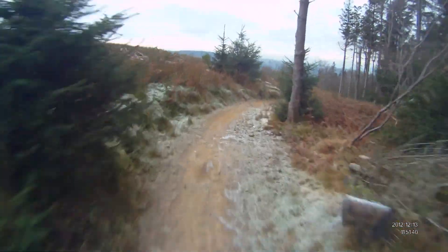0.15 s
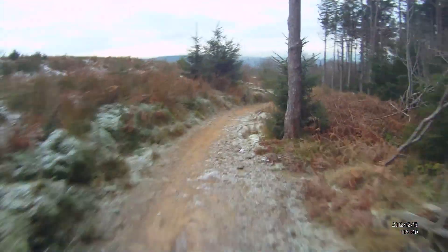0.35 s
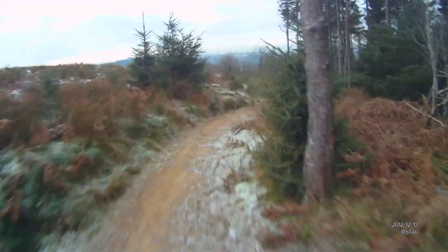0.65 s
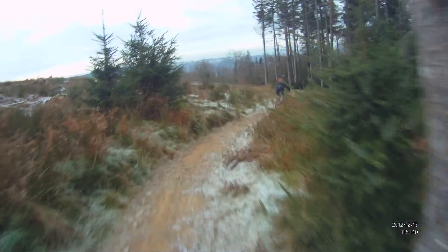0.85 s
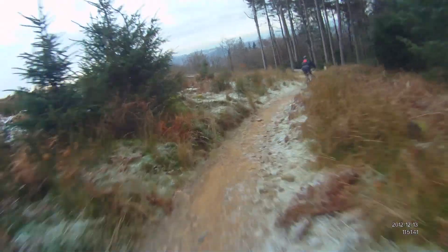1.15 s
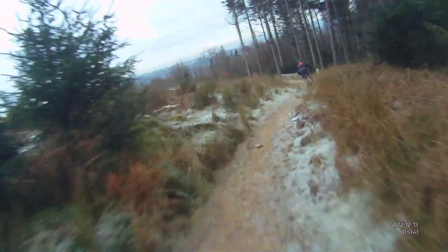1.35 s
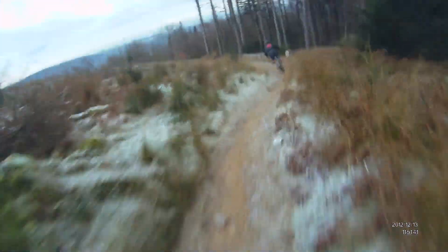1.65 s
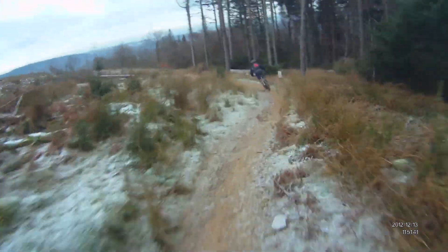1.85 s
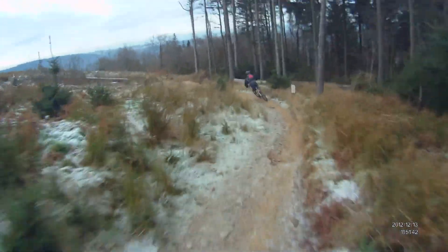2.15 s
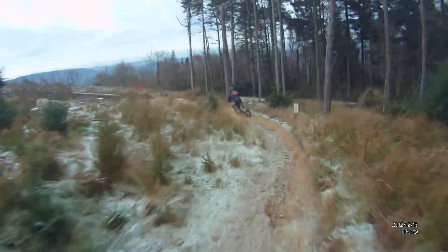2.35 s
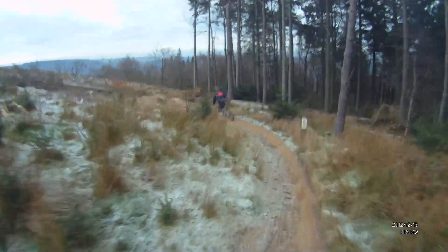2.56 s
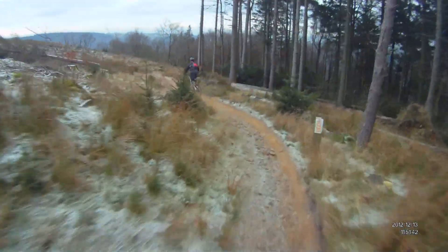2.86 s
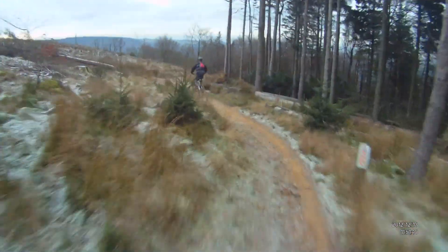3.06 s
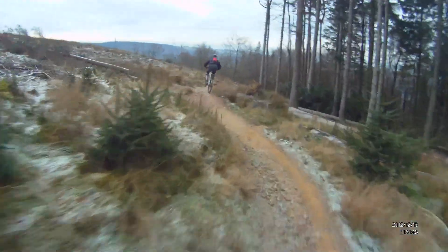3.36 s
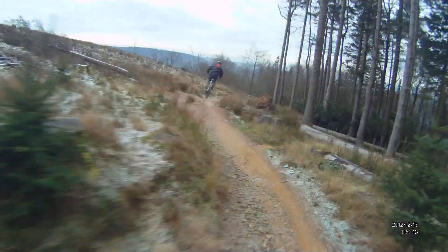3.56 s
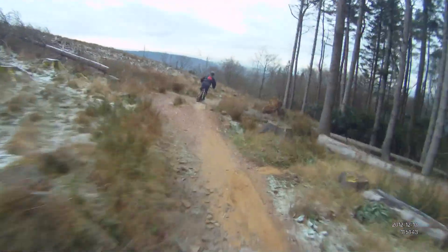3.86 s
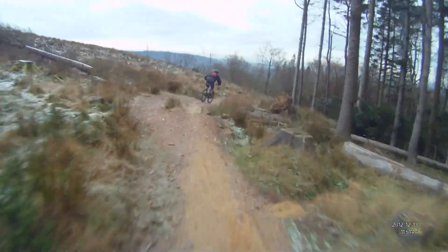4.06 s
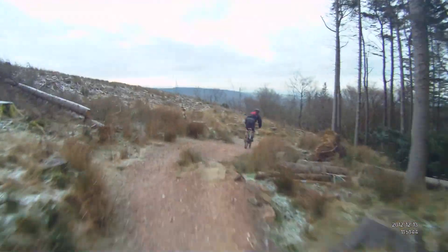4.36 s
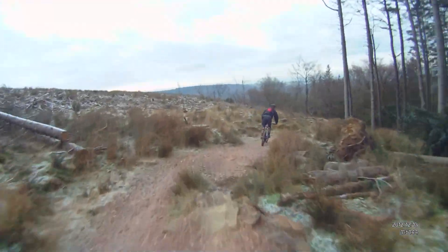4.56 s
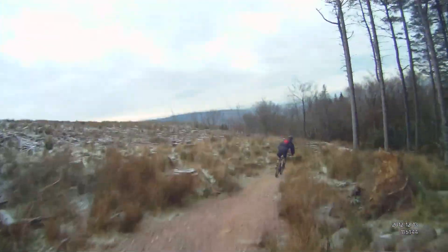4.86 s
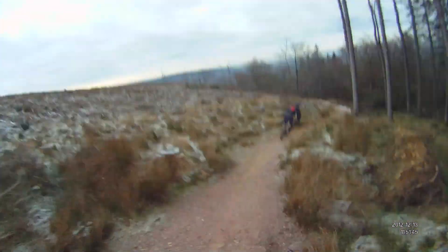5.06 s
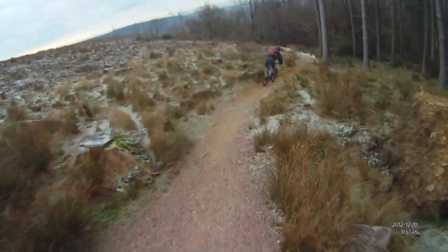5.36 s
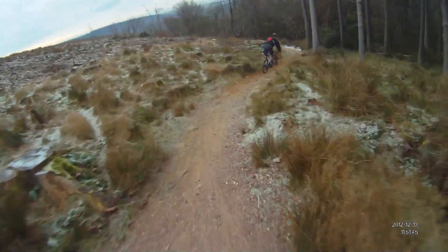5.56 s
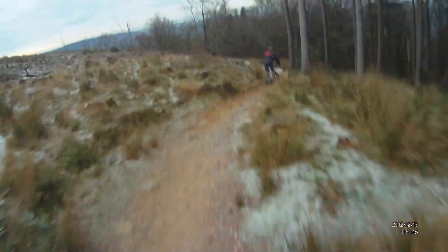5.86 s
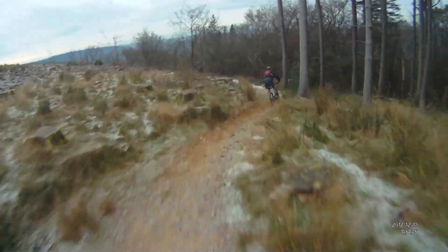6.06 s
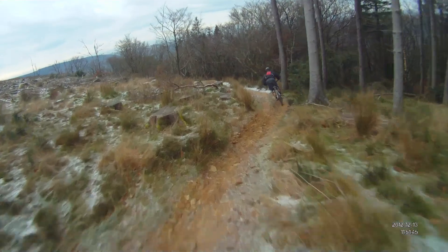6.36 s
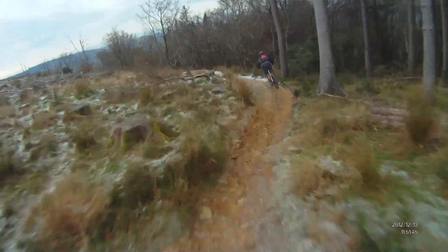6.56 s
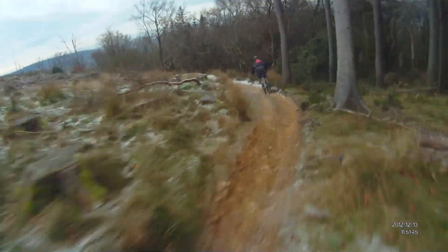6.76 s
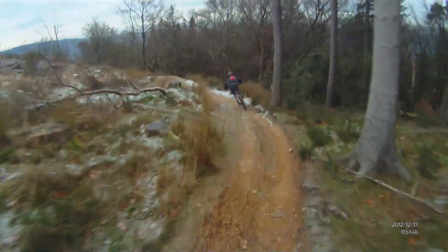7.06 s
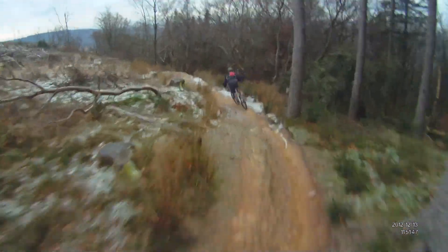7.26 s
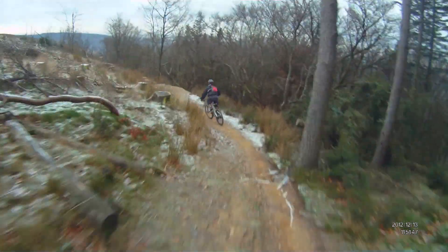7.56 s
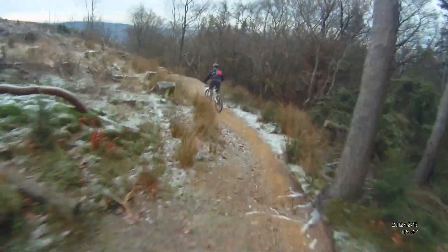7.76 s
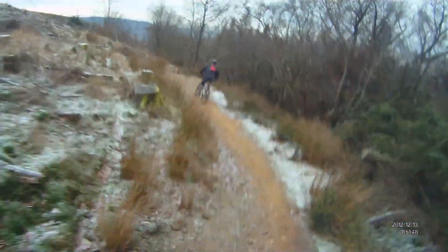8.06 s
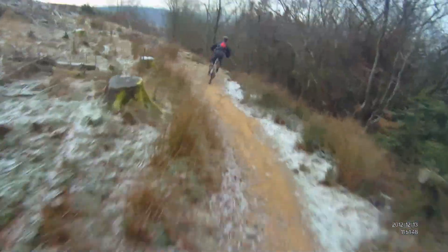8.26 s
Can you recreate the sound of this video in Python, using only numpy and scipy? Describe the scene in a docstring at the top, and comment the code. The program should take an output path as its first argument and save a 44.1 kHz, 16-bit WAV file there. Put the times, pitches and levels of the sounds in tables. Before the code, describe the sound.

Fast bike ride over loose stones heard from a small onboard camera: gritty crunch, clattering bumps, rattling ticks and buffeting wind that overloads.

```python
"""Gravel trail, fast downhill: a mountain bike, heard from a small camera in a plastic case that rides along.
Tyre crunch is random grains through the case resonances; scrubs are resonant noise, fine bursts bright grains.
Bumps ring the case modes in clacks that overload the microphone; the chain rattles as uneven runs of ticks.
Wind is shaped noise that swells with speed and crackles with spikes in strong gusts; single low thumps are
damped pops with band-passed noise. A faint hiss, rumble and thin whine lie underneath."""
import sys
import numpy as np
from scipy import signal
from scipy.fft import rfft, irfft
from scipy.io import wavfile

SR = 44100
rng = np.random.default_rng(int(sys.argv[2]) if len(sys.argv) > 2 else 0)


def wrap_up_sound(samples):
    """Save the sound to the file named by the first command line argument, as 16-bit audio."""
    columns = np.atleast_2d(samples).T
    # keep every value between -1 and 1, then stretch to whole-number steps
    tamed = np.clip(columns, -1, 1)
    steps = np.round(tamed * 32767).astype(np.int16)
    wavfile.write(sys.argv[1], SR, steps)


N = 370440
TIME = np.arange(N) / SR


def from_db(db):
    """Level in dB to amplitude."""
    return 10 ** (np.asarray(db) / 20)


def rms_one(x):
    """Scales to rms 1."""
    return x / np.sqrt(np.mean(x ** 2) + 1e-20)


def in_time(rows):
    """Straight lines between (time, value) rows."""
    return np.interp(TIME, *np.transpose(rows))


def swells(rows):
    """Sum of smooth bumps, one per (time s, half length s, height) row."""
    return sum(height * np.exp(-((TIME - at_s) / half_s) ** 2) for at_s, half_s, height in rows)


def butter(x, hz, kind, order=2):
    """Butterworth filter."""
    sos = signal.butter(order, np.clip(hz, 10, .45 * SR), kind, fs=SR, output="sos")
    return signal.sosfilt(sos, x)


def drift(rate_hz):
    """Slow random curve, rms 1: low-passed noise drawn every 40 samples."""
    step, warmup = 40, 2000
    r = np.exp(-2 * step * np.pi * rate_hz / SR)
    noise = rng.standard_normal(N // step + 2 + warmup)
    slow = signal.lfilter([1], [1, -2 * r, r * r], noise)[warmup:]
    return np.interp(np.arange(N) / step, np.arange(len(slow)), rms_one(slow))


def coloured(x, spectrum):
    """Shapes a signal with a spectrum smooth in log frequency; rms 1."""
    hz, db = np.transpose(spectrum)
    bins_hz = np.maximum(np.arange(N // 2 + 1) * SR / N, 1)
    gain_db = np.interp(np.log(bins_hz), np.log(hz), db)
    return rms_one(irfft(rfft(x) * from_db(gain_db), N))


def ring(clicks, hz, t60_s):
    """Damped mode: a unit click starts a decaying sine of height 1."""
    r = np.exp(-np.log(1000) / (t60_s * SR))
    w = 2 * np.pi * hz / SR
    return signal.lfilter([0, np.sin(w)], [1, -2 * r * np.cos(w), r * r], clicks + 1e-18)


def resonance(x, hz, width_hz):
    """Two-pole band-pass, peak gain 1."""
    r = np.exp(-np.pi * width_hz / SR)
    zeros = np.array([1, 0, -1]) * (1 - r * r) / 2
    return signal.lfilter(zeros, [1, -2 * r * np.cos(2 * np.pi * hz / SR), r * r], x)


def grains(per_s, spread_db):
    """Clicks at random moments: many small, a few large."""
    sizes = from_db(spread_db * np.minimum(rng.exponential(1, N), 4))
    return (rng.random(N) < per_s / SR) * sizes * rng.choice([-1, 1], N)


# ground under the tyres: (time [s], relative crunch level [dB])
GROUND_LEVEL = [(0.0, -26.5), (1.08, -19.5), (1.73, -20), (1.99, -18), (3.41, -23), (4.82, -24),
                (5.21, -12.5), (5.5, -24), (6.81, -19), (7.51, -22), (7.7, -26), (8.4, -22)]
# patches of loose stones: (time [s], half length [s], extra crunch [dB])
STONE_PATCHES = [(1.689, 0.0051, 11), (2.42, 0.024, 5), (2.502, 0.0063, 7), (3.354, 0.0071, 7),
                 (3.469, .007, 5), (3.602, .006, 8), (3.773, 0.005, 10), (3.835, .009, 7), (3.95, 0.016, 6),
                 (5.78, 0.1, 4), (7.366, .007, 10), (7.43, .007, 6), (7.65, .008, 6)]
# brief dips in the crunch: (time [s], half length [s], drop [dB])
CRUNCH_DIPS = [(1.81, 0.02, 4), (2.1, 0.068, 3), (2.24, 0.057, 3.5), (2.82, 0.064, 9), (5.28, 0.14, 23),
               (7.33, 0.029, 10)]
# case resonances in the tyre noise: (frequency [Hz], width [Hz], relative level [dB])
TYRE_RESONANCES = [(1308, 88.5, 8), (1660, 543, -3), (2126, 530, -4), (2626, 473, -3), (2957, 268, -2)]


def tyres(judder_db=2.9, body_db=-1.63, grit_db=-33, pebbles_db=-6):
    """Fine gravel and single pebbles crunch under the tread; the case resonances pass most of it."""
    ground_db = in_time(GROUND_LEVEL) - swells(CRUNCH_DIPS)
    force = from_db(ground_db + swells(STONE_PATCHES) + judder_db * drift(38))
    gravel = rms_one(grains(9000, 3.1)) * force
    pebbles = from_db(pebbles_db) * rms_one(grains(160, 3.5)) * force
    body = np.zeros(N)
    for k, (hz, width_hz, db) in enumerate(TYRE_RESONANCES):
        body += (-1) ** k * from_db(db) * resonance(gravel + pebbles, hz, width_hz)
    body = rms_one(butter(butter(body, 4250, "low", order=7), 1210, "high"))
    grit = rms_one(butter(gravel, [4800, 6400], "band"))
    return np.std(gravel) * (from_db(body_db) * body + from_db(grit_db) * grit)


# tyre scrubs: (time [s], half length [s], pitch [Hz], level [dB])
TYRE_SCRUBS = [(2.422, 0.042, 1750, -19.5), (3.089, 0.029, 1180, -22.5)]


def scrubs(width_hz=260):
    """Sliding rubber gives a short, hoarse note: noise through two equal resonances."""
    out = np.zeros(N)
    for at_s, half_s, hz, db in TYRE_SCRUBS:
        hoarse = resonance(rng.standard_normal(N), hz, width_hz)
        note = rms_one(resonance(hoarse, hz, width_hz))
        out += from_db(db) * note * np.exp(-((TIME - at_s) / half_s) ** 2)
    return out


# short bursts of fine, bright crackle: (time [s], half length [s], level [dB])
CRACKLE_BURSTS = [(2.43, .03, -46), (5.72, .05, -37), (6.44, .13, -43), (6.84, .04, -43)]


def crackle_bursts(per_s=900):
    """Short bursts of fine, bright crackle: band-passed random clicks under smooth swells."""
    amount = swells([(at_s, half_s, from_db(db)) for at_s, half_s, db in CRACKLE_BURSTS])
    return amount * rms_one(butter(grains(per_s, 3.5), [4200, 9500], "band", order=3))


# bumps on the case: (time [s], relative strength [dB], hardness [dB], clatter length [s] if it rebounds)
CASE_KNOCKS = [(0.5809, -1.5, -5.5), (1.044, 7.5, -5), (1.4422, 4, -21), (1.7554, 7, -6, .022),
               (1.8495, 7, -2), (1.856, 0, -7), (1.899, -4, -15), (1.928, -6.5, 2, .014), (1.952, -3.5, -6),
               (1.997, 3, -30), (2.0244, 2, 6), (2.0771, -2, -6.5), (2.1156, -10, 2), (2.1255, -8.5, 2),
               (2.173, -4.5, -2), (2.1804, -2, -6), (2.3164, -4.5, 0), (2.642, -1, -6, .012),
               (2.715, -8, -3), (2.7357, 2, -5), (2.749, -2.5, -7), (2.8787, 2.5, -1, .034),
               (2.953, 2, -2, .024), (3.0074, -1, 4), (5.0185, -3.5, 0), (5.034, 4.5, 7),
               (5.0535, 8, -9, .02), (5.103, 2, -2.5), (5.116, 12, -11), (5.1355, 6, -2),
               (5.1445, 13.5, -17), (5.156, 3, 8), (5.164, 11, -4, .021), (5.1904, 2, 3),
               (5.1975, 3, 0, .013), (5.2225, -0.5, -5), (5.2485, 0, 3), (5.2525, 6, -4, .014),
               (5.283, -1, -3), (5.322, -7, -2), (5.342, -3, -30), (5.3796, 6.5, -8), (5.3944, -5, -1),
               (5.4385, -12, 5), (5.4602, 3, 2), (5.469, -2, 0), (5.541, -10, 7), (6.021, 5.5, 0),
               (6.663, -2.5, -6.5), (6.76, -3, -12), (6.9789, 4, -6), (7.0962, 0, -1.5), (7.166, 10, -7.5),
               (7.2305, 1, 8), (7.259, -7, -7), (7.275, -1, 1), (8.117, 3.5, -31),
               (8.1315, 3.5, -8.5, .018), (8.167, 10, -1.5, .013), (8.202, -1, -8, .018), (8.2353, 3, 0),
               (8.2579, 9.5, 1), (8.3003, 0.5, 3), (8.3693, -10, 11)]


def blows(count=6, rebound_s=.0085, jitter=0.2033, loss_db=2, colour_db=7.5):
    """Each knock and the ever weaker, uneven rebounds within its clatter: (s, dB, hardness dB)."""
    out = []
    for at_s, db, hardness_db, *clatter in CASE_KNOCKS:
        clatter_s = sum(clatter)   # 0 if no rebound
        delays_s = rebound_s * (np.arange(count) + 1 + jitter * rng.standard_normal(count))
        colours_db = hardness_db + colour_db * rng.standard_normal(count)
        out.append((at_s, db, hardness_db))
        for delay_s, rebound_hardness_db in zip(delays_s, colours_db):
            if delay_s < clatter_s:
                rebound_db = db - loss_db * delay_s / rebound_s
                out.append((at_s + delay_s, rebound_db, rebound_hardness_db))
    return out


# case modes: (frequency [Hz], relative level [dB], t60 [s])
CASE_MODES = [(1442, 0, 0.036), (1945, -7.5, 0.019), (2187, 2.5, 0.012), (2620, -2, 0.013),
              (2866, 4.5, 0.012), (5230, -1.5, 0.0019), (7480, -15, 0.0052)]


def case_ring(soft, hard, detune=1):
    """The lowest mode answers the body of a blow, the upper modes its hard edge."""
    return sum(from_db(db) * ring(hard if k else soft, hz * detune, t60_s)
               for k, (hz, db, t60_s) in enumerate(CASE_MODES))


def knocks(chatter_db=-23, chatter_s=0.0013, crack_db=-27, edge_db=-6, lead_s=0.001015, pitch_spread=0.03):
    """A blow inside milliseconds of buzzing contact rings the pressed case, each time a little differently."""
    out = np.zeros(2 * N)
    age = TIME[:SR // 10] / chatter_s
    contact = age * np.exp(1 - np.minimum(age, 50))   # peaks at chatter_s
    lead = round(lead_s * SR)
    for at_s, db, hardness_db in blows():
        blow, hardness = signal.unit_impulse(len(age), lead), from_db(hardness_db)
        buzz = hardness * contact * rng.standard_normal(len(age))
        edge = from_db(edge_db) * hardness * blow + from_db(chatter_db) * buzz
        clack = case_ring(blow, edge, 1 + pitch_spread * rng.standard_normal())
        clack += from_db(crack_db) * butter(buzz, [3000, 9000], "band")
        start = round(at_s * SR) - lead
        out[start:start + len(age)] += from_db(db) / np.hypot(1, hardness) * clack
    return butter(out[:N], 1280, "high")


# chain and loose parts: (start [s], end [s], relative tick level [dB])
RATTLE_RUNS = [(0.31, 0.606, -24.5), (1.356, 1.77, -20.5), (1.86, 2.2, -13), (2.602, 2.77, -17),
               (2.892, 3.03, -11), (4.963, 5.589, -24), (6.003, 6.06, -7), (6.54, 6.69, -16),
               (7.04, 7.304, -23), (8.096, 8.35, -17)]


def rattle(tick_s=.0088, uneven=.5, spread_db=4.5, ring_db=-9, jingle_db=-10, jingle_s=0.00085,
           tick_edge_hz=4500):
    """Links slap in a quick, uneven run; each tick rings the case and sizzles briefly like metal."""
    shaking = sum(from_db(db) * ((TIME > start_s) & (TIME < end_s)) for start_s, end_s, db in RATTLE_RUNS)
    gap, size, sign = rng.standard_normal((N // 100, 3)).T
    at = np.cumsum(tick_s * np.exp(uneven * gap) * SR).astype(int)
    ticks = np.bincount(at, from_db(spread_db * size) * np.sign(sign), N)[:N] * shaking
    decay = np.exp(-1 / (jingle_s * SR))
    sizzle = signal.lfilter([1], [1, -decay], abs(ticks) + 1e-18) * rng.standard_normal(N)
    rings = butter(case_ring(ticks, ticks), [950, tick_edge_hz], "band")
    jingle = butter(sizzle, [4600, 9400], "band", order=4)
    return from_db(ring_db) * rings + from_db(jingle_db) * jingle


# air flow, following speed: (time [s], relative wind level [dB])
WIND_LEVEL = [(0.0, -33.5), (0.63, -19.5), (1.05, -13.5), (1.64, -23.5), (1.94, -24), (2.46, -40),
              (3.39, -36), (3.79, -34), (4.4, -21.5), (5.12, -24.5), (5.61, -23), (5.94, -21.5),
              (6.45, -15.3), (6.9, -22.5), (7.42, -26.5), (7.72, -34.5), (8.4, -37)]
# short gusts and lulls: (time [s], half length [s], change [dB])
WIND_GUSTS = [(.08, 0.054, -9), (.21, 0.035, 8), (.33, .025, -5), (2.08, 0.039, 7), (2.29, 0.03, 10),
              (2.94, .06, 12), (3.945, .02, 6), (4.23, 0.06, 7), (4.95, .04, -6), (5.68, 0.075, 6.5),
              (5.875, 0.02, -13), (7.27, 0.029, 8), (7.54, 0.035, 7)]
# rush spectrum: (frequency [Hz], relative level per Hz [dB])
WIND_SPECTRUM = [(25, -36), (60, -18), (110, -9), (200, -2.5), (350, 2), (600, 3.5), (900, 0.5),
                 (1300, -6.5), (1900, -18.5), (3000, -19), (4200, -56), (8000, -60)]


def wind(trim_db=1.5, lump_db=2.0, crackle_db=-1, crackle_growth=2.8, gust_db=-14, spikes_per_s=420,
         clump_db=5):
    """Lumpy turbulence; strong gusts shed clumps of sharp spikes that crackle."""
    wind_db = in_time(WIND_LEVEL) + swells(WIND_GUSTS)
    lumps = drift(55)
    rush = coloured(rng.standard_normal(N), WIND_SPECTRUM) * from_db(wind_db + trim_db + lump_db * lumps)
    excess_db = np.minimum(wind_db - gust_db, 2)
    rate_per_s = spikes_per_s * from_db(crackle_growth * excess_db + clump_db * lumps)
    spikes = grains(rate_per_s, 4.4) * from_db(crackle_db + .5 * excess_db)
    crackle = butter(butter(spikes, [600, 1900], "band", order=1), 5200, "low", order=1)
    return rush + crackle


# single low thumps, perhaps bumps or air: (time [s], relative strength [dB])
LOW_THUMPS = [(0.023, -6.5), (2.264, -5), (2.368, -1), (2.461, -3.5), (2.492, -8), (2.683, -4), (3.568, -6),
              (3.602, -10), (3.644, -8), (3.856, -6), (3.931, -3), (3.951, -7), (4.014, -8), (4.028, -2),
              (7.53, -5), (7.951, -9), (8.046, -11), (8.083, -3), (8.208, -3.5), (8.388, -4.5)]


def thumps(length_s=0.00327, swell_db=-11, tail_db=-24, tail_s=0.012, pop_hz=500, pop_t60_s=0.0025, pop_db=2):
    """Each low thump is a quick damped pop with a short swell and tail of band-passed noise."""
    swell, tail, kicks = np.zeros((3, N))
    for at_s, db in LOW_THUMPS:
        age = np.maximum(TIME - at_s + length_s / 2, 0) / length_s
        swell += from_db(db) * age * np.exp(1 - np.minimum(age, 50))
        tail += from_db(db) * (TIME > at_s) * np.exp(-abs(TIME - at_s) / tail_s)
        kicks[round((at_s + length_s) * SR)] = from_db(db + pop_db)
    pops = butter(ring(kicks, pop_hz, pop_t60_s), [180, 1500], "band")
    noise = rms_one(butter(rng.standard_normal(N), [240, 930], "band"))
    return pops + (from_db(swell_db) * swell + from_db(tail_db) * tail) * noise


# hiss and rumble spectrum: (frequency [Hz], relative level per Hz [dB])
HISS_SPECTRUM = [(30, 40), (100, 22), (800, 9), (3300, 4), (4500, -1), (6000, 0), (7200, -8), (10000, -11),
                 (15000, -12.5)]


def electronics(hiss_db=-36.0, whine_hz=7850, whine_db=-58):
    """A faint hiss and rumble, and the camera's thin whine of wavering pitch."""
    narrow = resonance(resonance(rng.standard_normal(N), whine_hz, 130), whine_hz, 130)
    whine = rms_one(np.cos(np.angle(signal.hilbert(narrow))))   # keeps the phase, flattens the level
    hiss = coloured(rng.standard_normal(N), HISS_SPECTRUM)
    return from_db(whine_db) * resonance(whine, whine_hz, 500) + from_db(hiss_db) * hiss


def scene():
    """All layers together, in mono."""
    ground = tyres() + scrubs() + crackle_bursts()
    bike = knocks() + rattle()
    air = wind()
    return (ground + bike + air + thumps() + electronics())[None]


def record(dry, bass_cut_hz=103, top_cut_hz=15700):
    """The input clips hard near full scale; the deep bass and the top are cut."""
    clipped = butter(np.clip(dry, -.97, .97), bass_cut_hz, "high")
    return signal.sosfiltfilt(signal.butter(14, top_cut_hz, fs=SR, output="sos"), clipped)


dry = scene()
out = record(dry)
wrap_up_sound(out)
```